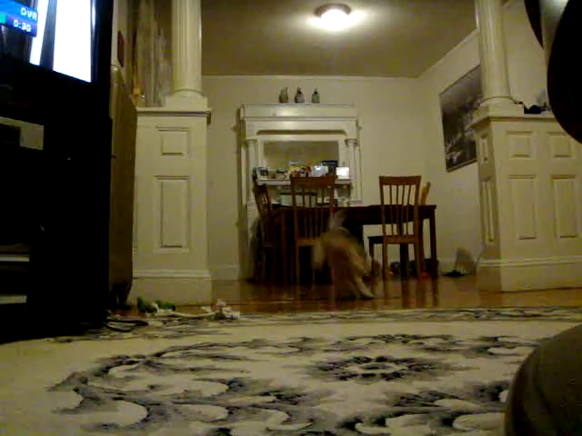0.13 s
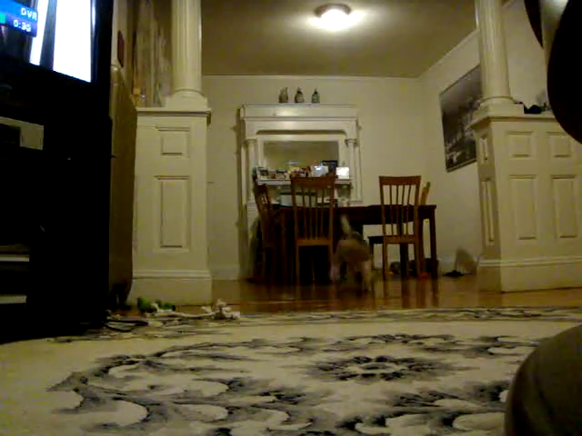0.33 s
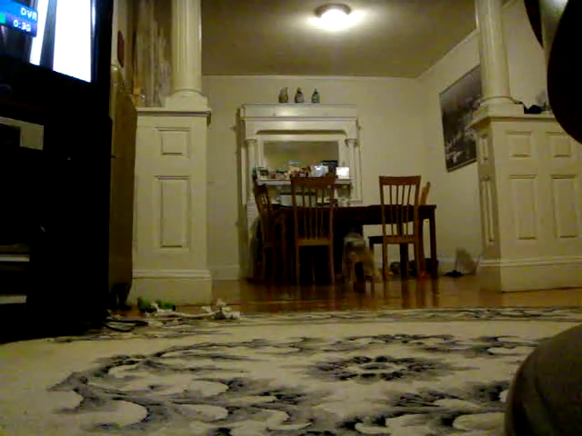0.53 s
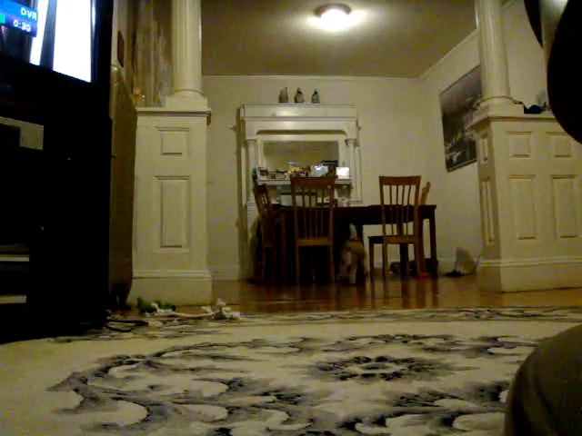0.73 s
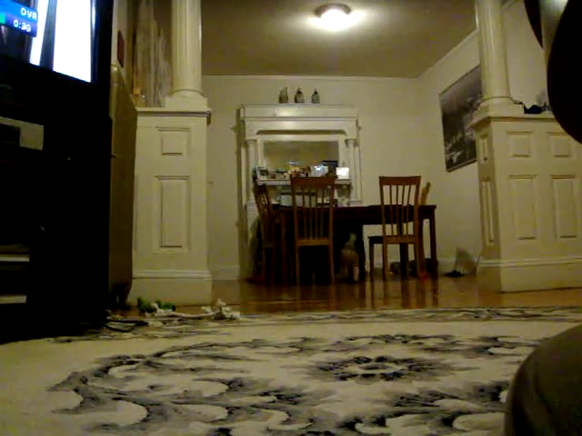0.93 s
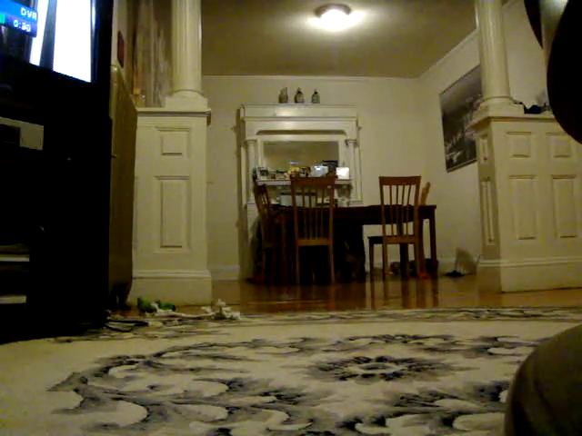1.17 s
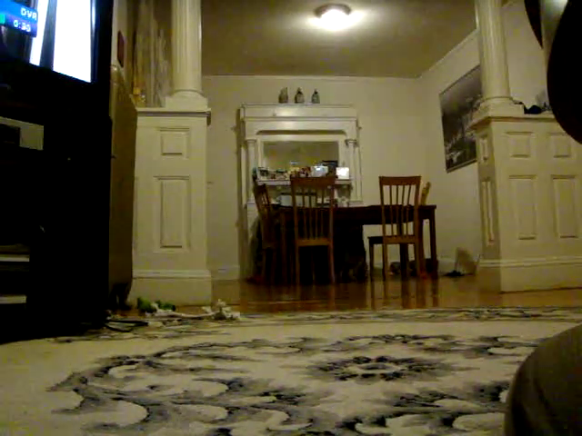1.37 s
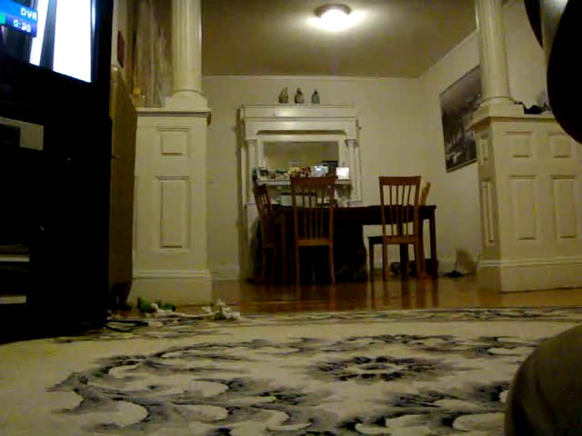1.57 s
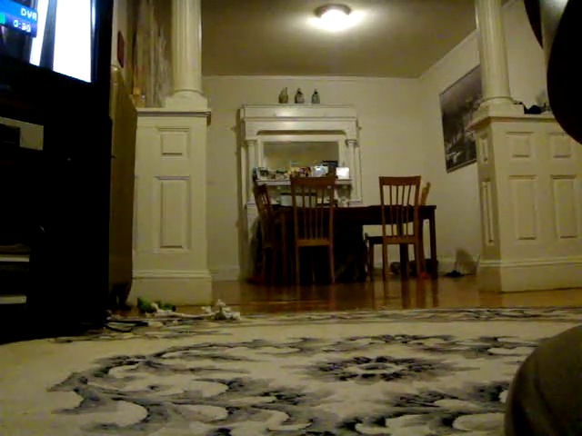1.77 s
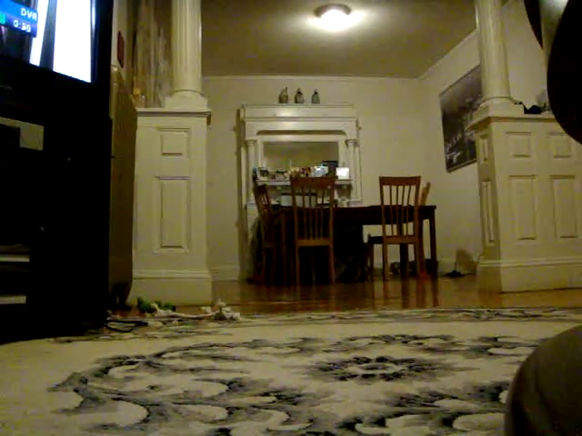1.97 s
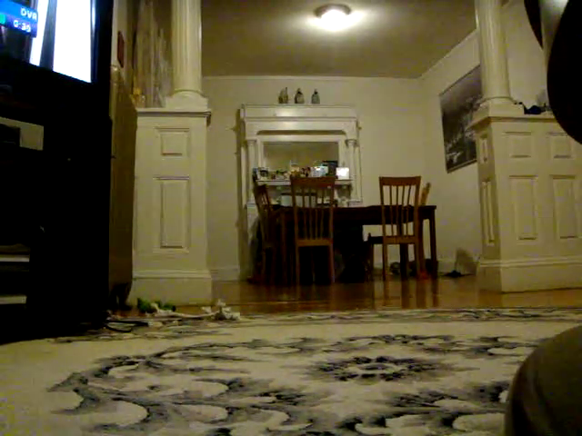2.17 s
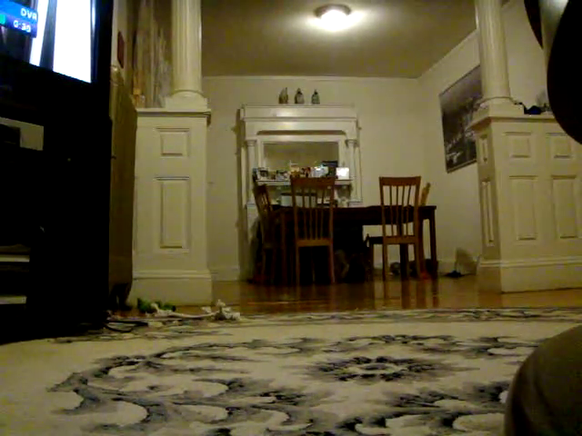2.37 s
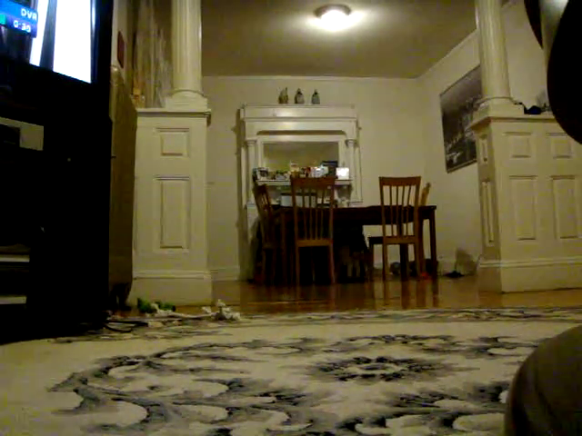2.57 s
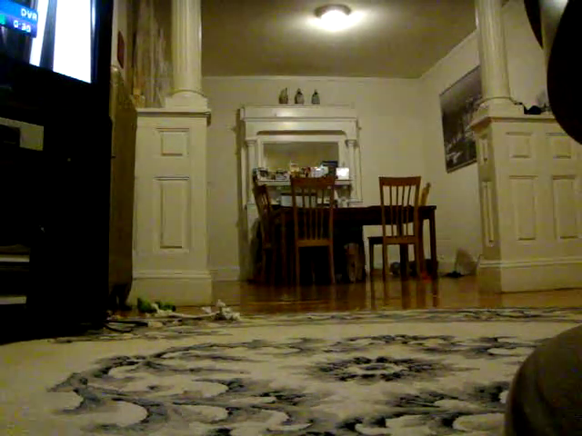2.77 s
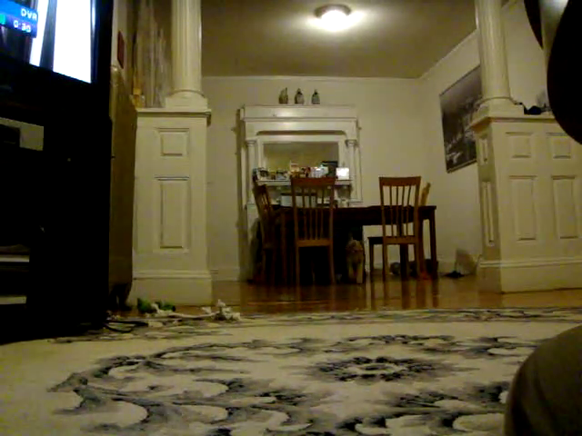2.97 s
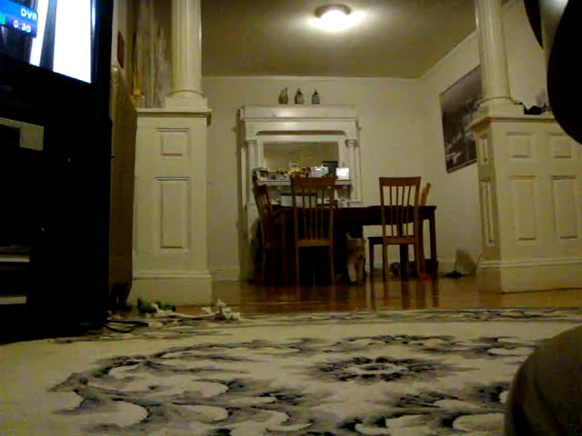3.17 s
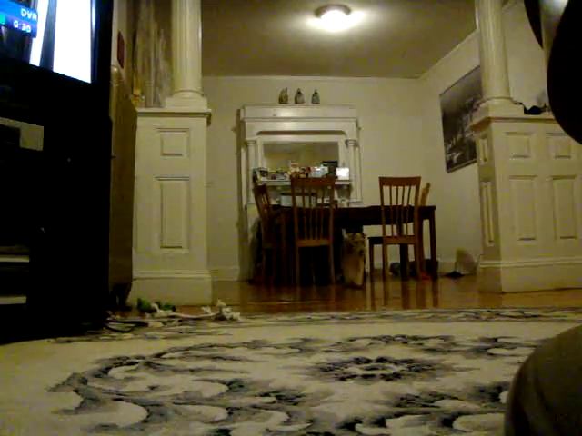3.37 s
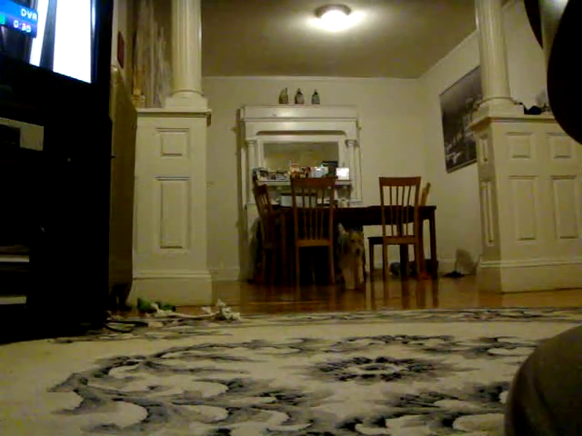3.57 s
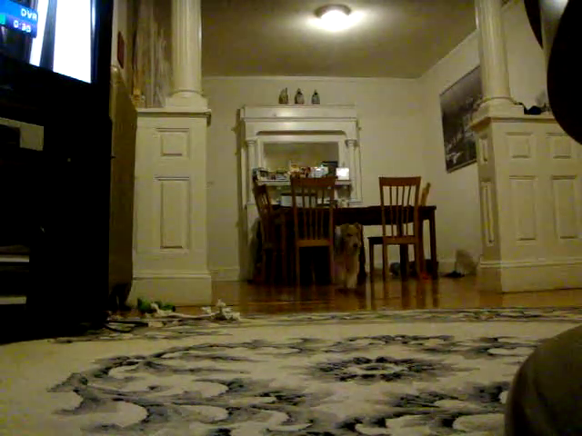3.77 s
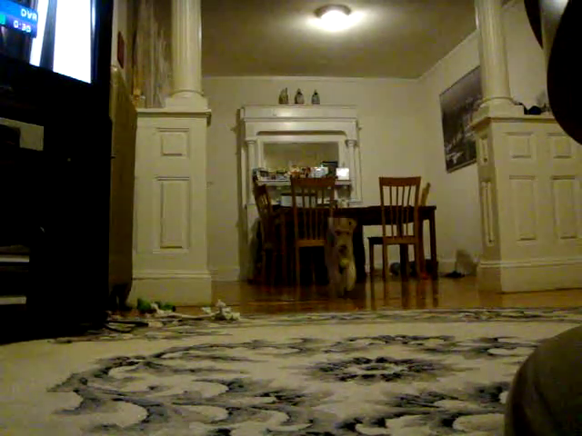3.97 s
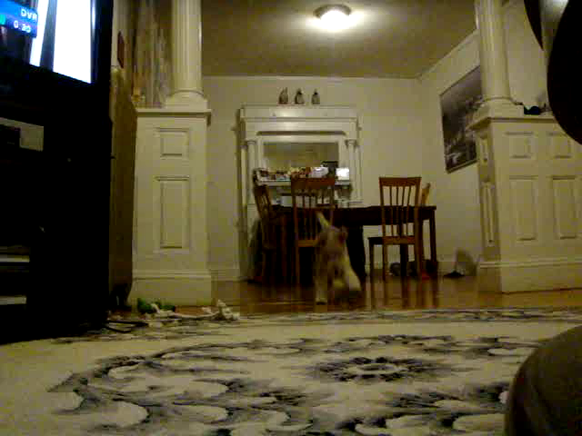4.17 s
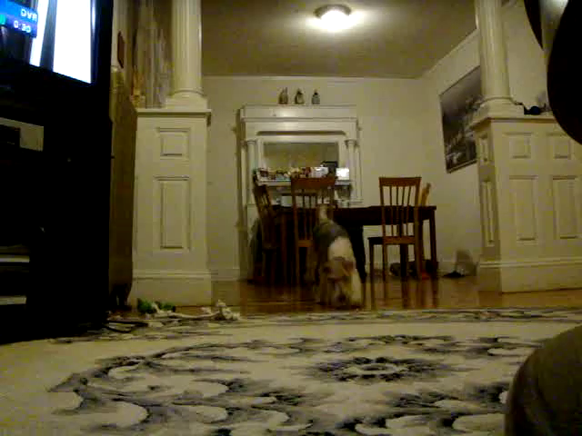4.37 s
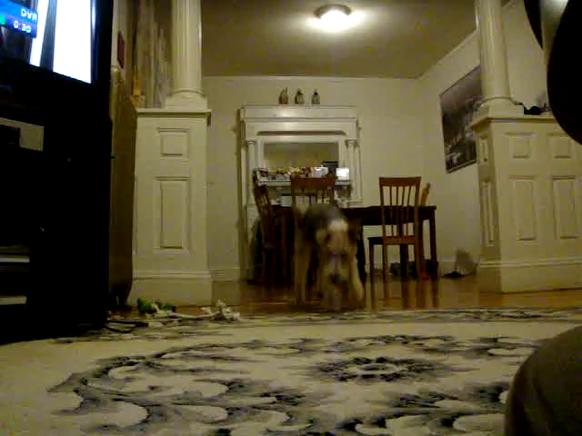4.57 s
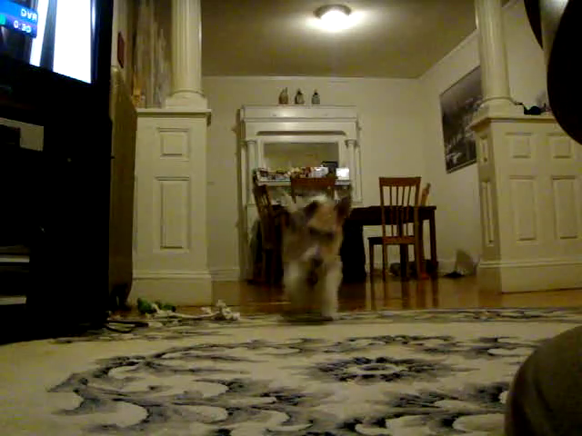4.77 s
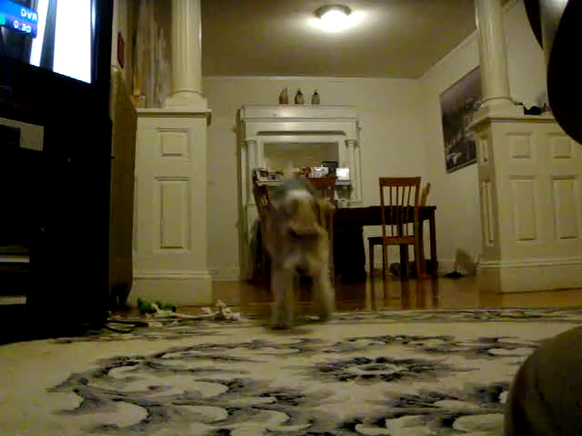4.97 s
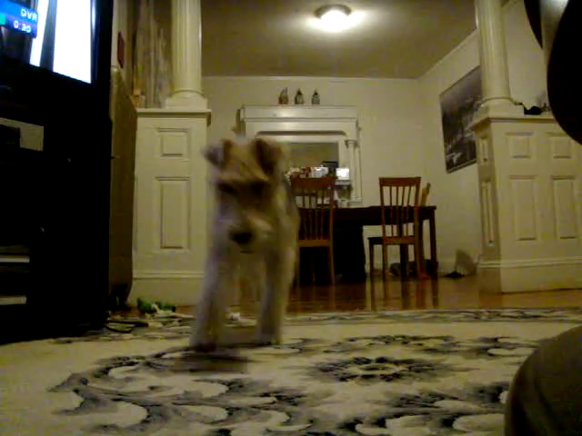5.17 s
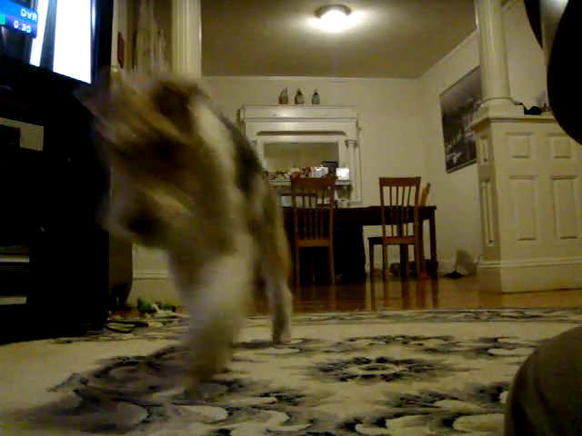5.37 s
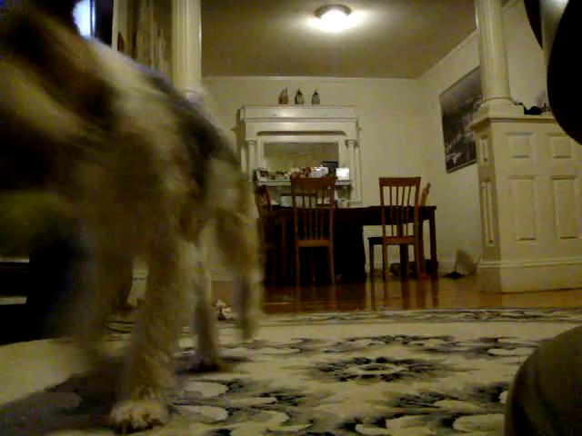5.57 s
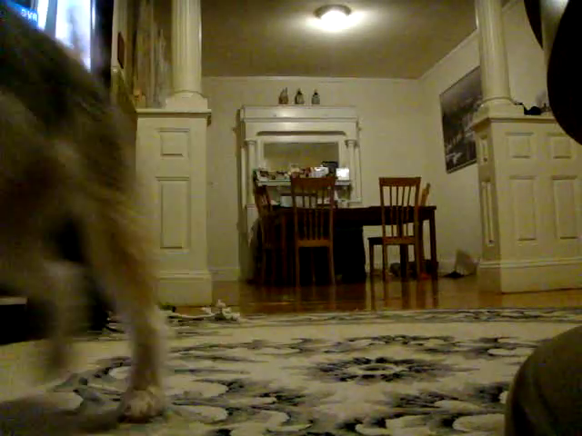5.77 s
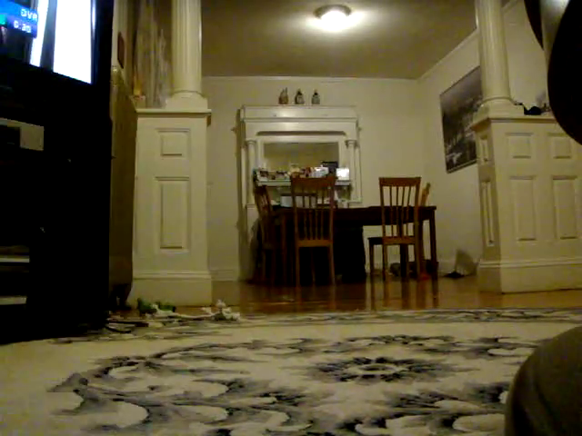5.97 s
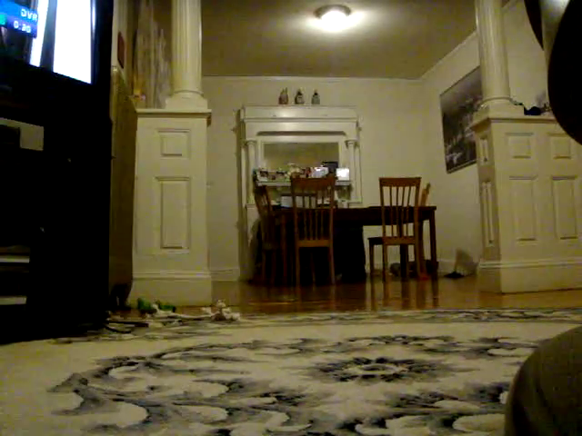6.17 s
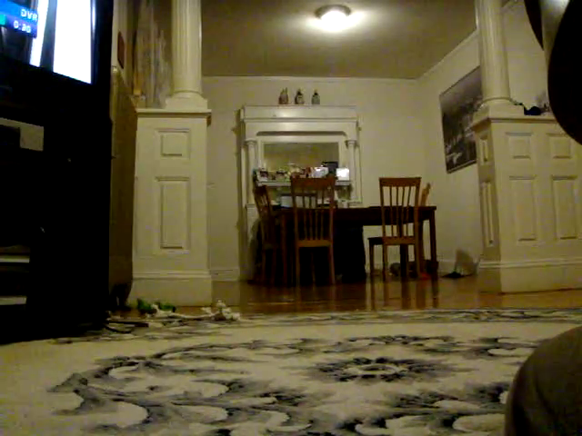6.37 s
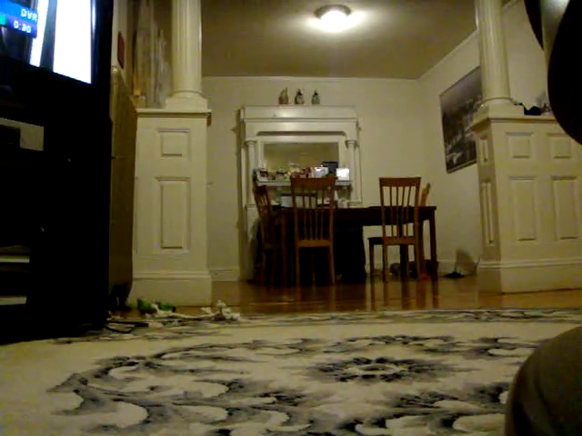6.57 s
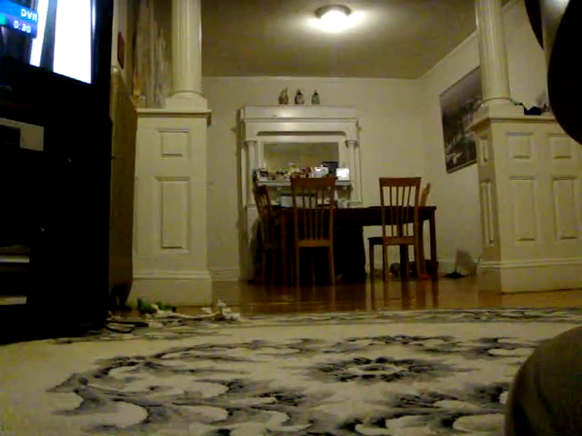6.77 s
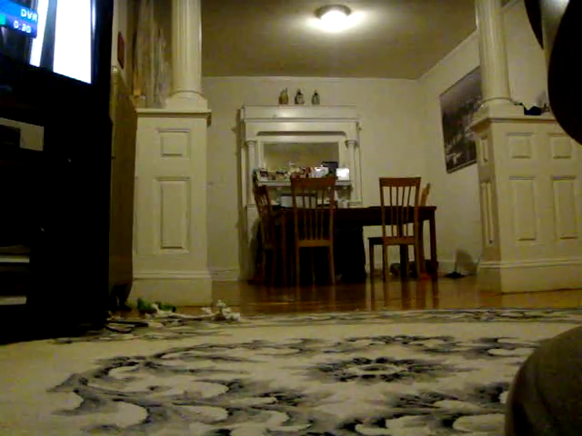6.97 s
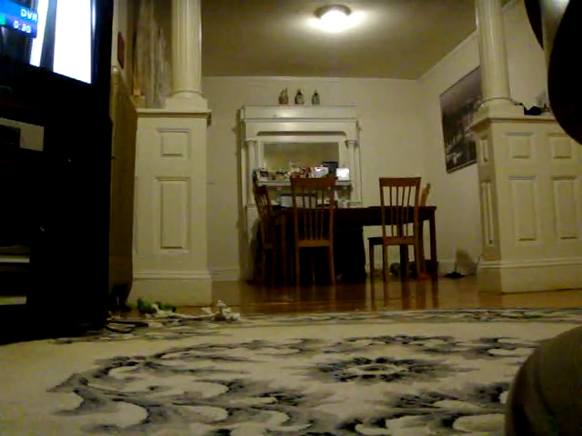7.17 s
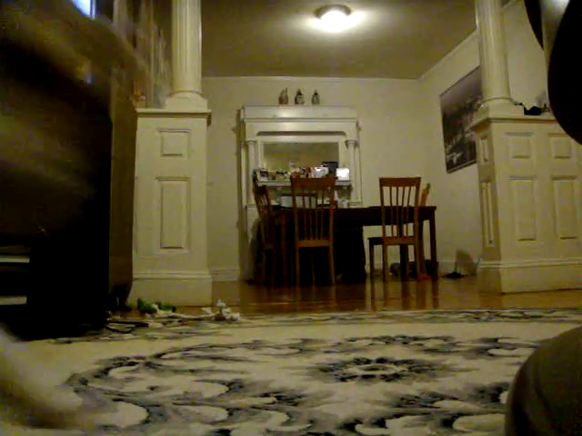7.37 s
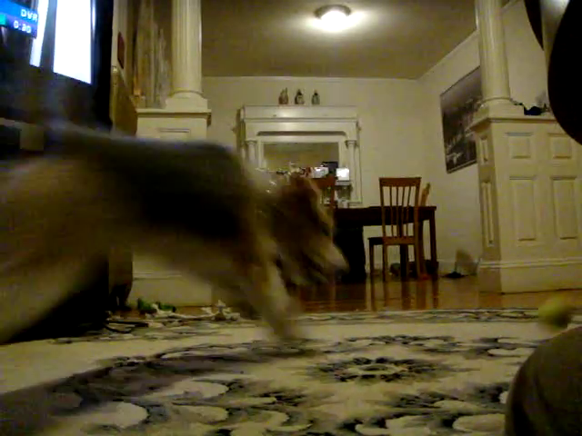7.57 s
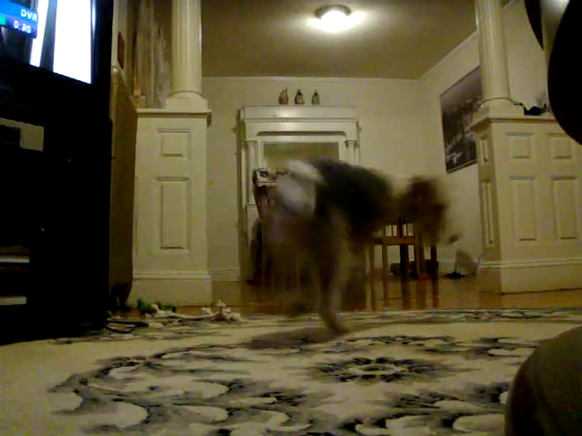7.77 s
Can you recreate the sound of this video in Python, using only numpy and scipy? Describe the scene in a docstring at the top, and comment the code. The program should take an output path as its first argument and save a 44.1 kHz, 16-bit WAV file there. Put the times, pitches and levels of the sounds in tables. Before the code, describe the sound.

Dog paws patter away over hardwood and return, followed by close thumps, ticks and rustling as it plays with a toy on a rug.

```python
"""Small dog on hardwood and rug

A small dog gallops away over a hardwood floor, trots back, pounces on a toy and crosses a rug to play
close by. On the boards its claws click and its pads thud into a live room. Near the microphone, paws
and toy knock, tick and rustle almost dry. Room murmur and camera hiss lie underneath."""
import sys
import numpy as np
from scipy import signal
from scipy.fft import rfft, irfft, next_fast_len
from scipy.io import wavfile
from scipy.ndimage import map_coordinates

SR = 44100
rng = np.random.default_rng(int(sys.argv[2]) if len(sys.argv) > 2 else 0)


def transcribe(u):
    """Save the signal u as a 16-bit wav file named by the first command-line argument.

    u: samples, shape (n,) or (channels, n), limited to [-1, 1]; the rate is SR.
    q: integer samples, one column per channel.
    """
    v = np.clip(np.atleast_2d(u).T, -1, 1)
    q = np.round(v * 32767).astype(np.int16)
    wavfile.write(sys.argv[1], SR, q)


N = 344277


def amp(db):
    """Gain of a level in dB."""
    return 10 ** (np.asarray(db) / 20)


def unit(x):
    """x at rms 1."""
    return x / np.sqrt(np.mean(x ** 2) + 1e-20)


def along(points, hz):
    """Interpolate (Hz, value) points on a log frequency axis."""
    knots_hz, values = np.transpose(points)
    return np.interp(np.log(hz + 1), np.log(knots_hz + 1), values)


def noise(size, gain):
    """Noise of rms 1, coloured by a gain function of frequency."""
    m = next_fast_len(size)
    spectrum = rfft(rng.standard_normal(m)) * gain(np.fft.rfftfreq(m, 1 / SR))
    return unit(irfft(spectrum, m)[:size])


def hump(centre_hz, below, above):
    """Gain function falling by the given dB per octave below and above its centre."""
    def gain(hz):
        octaves = np.log2((hz + 1) / centre_hz)
        return amp(np.where(octaves < 0, below * octaves, -above * octaves))
    return gain


def resonance(hz, centre_hz, width_hz):
    """Bell-shaped gain of one mode, 1 at its centre."""
    return 1 / (1 + ((hz - centre_hz) / (width_hz / 2)) ** 2)


def rise(t, tau_s):
    """Exponential attack from 0 to 1."""
    return 1 - np.exp(-t / tau_s)


def wobble(knots_per_s):
    """Smooth random curve over the whole scene."""
    knots = rng.standard_normal(int(N * knots_per_s / SR) + 4)
    return map_coordinates(knots, [np.arange(N) * knots_per_s / SR])


def add(track, start_s, sound):
    """Mix a sound into the track."""
    part = track[round(start_s * SR):][:len(sound)]
    part += sound[:len(part)]


def room_tail(gain):
    """Fresh noise tail in which each frequency dies at the room's rate."""
    # Room decay. Each row: frequency in Hz, T60 in seconds.
    decay = [(100, 0.76), (700, 0.55), (2000, 0.81), (5000, 0.62), (10000, 0.44)]
    hz, t, spectra = signal.stft(noise(SR * 3 // 4, gain), SR, nperseg=256)
    return signal.istft(spectra * amp(-60 * t / along(decay, hz)[:, None]), SR, nperseg=256)[1]


def background():
    """Room murmur and camera hiss, wavering slightly in level."""
    # Noise spectrum. Each row: frequency in Hz, relative density in dB.
    spectrum = [(12, -57), (20, 7), (91, -19.5), (104, -8), (186, -7), (229, -11.5), (268, -11), (418, -11),
                (452, -11), (603, -15.5), (805, -13), (1160, -16), (2300, -24.5), (9460, -29), (10500, -41),
                (13600, -77), (22000, -120)]
    level_db = -48.5 + 0.33 * wobble(4.98)
    return amp(level_db) * noise(N, lambda f: amp(along(spectrum, f)))


def pads():
    """A soft landing booms in the modes of boards and joists, with a dull knock in the room on top."""
    # Landings. Each row: start in seconds, boom level in dB, boom centre in Hz, knock in dB re boom.
    landings = [(0, -33.5, 125, -9), (0.026, -24.5, 159, -25.5), (0.044, -28, 258, -21),
                (0.073, -36, 111, -21), (0.152, -17.5, 154, -17.5), (0.19, -24.5, 304, -9.5),
                (0.245, -30.5, 188, -22), (0.309, -32, 139, -7.5), (0.409, -29.5, 170, -7.5),
                (0.55, -36, 149, -10), (0.618, -40, 205, -4), (0.743, -34.5, 135, -12.5),
                (0.788, -40.5, 158, -9), (0.872, -55, 142, -7), (0.948, -35.5, 180, -9),
                (1.124, -52.5, 338, 15), (1.143, -37, 184, 0.5), (1.281, -32.5, 300, -6),
                (1.439, -33.5, 157, -7.5), (1.501, -37, 234, -11), (2.413, -36.5, 340, -13.5),
                (2.466, -44, 348, -20), (4.205, -24, 148, -9.5), (4.239, -32.5, 207, -10.5),
                (4.361, -23.5, 156, -16.5), (4.42, -25.5, 192, -11), (4.529, -33.5, 230, -0.5),
                (4.598, -36.5, 254, -14)]
    # Hollow modes of boards and room. Each row: centre in Hz, width in Hz, gain in dB.
    modes = [(105.5, 116, 9), (150.4, 55, -5.5), (191, 71, -3.5), (245.4, 23, 2.5), (345.6, 35, 3),
             (417, 22, -4.5), (536, 49, -7)]
    # The dog's run out and back. Each row: time in seconds, distance in metres.
    path = [(0, 1.7), (0.3, 5.5), (1.2, 6.9), (2.4, 5.3), (3.5, 5.5), (4.2, 3.9), (4.6, 1)]
    out, t = np.zeros(N), np.arange(SR // 2) / SR
    boards = lambda f: 0.16 + sum(amp(db) * resonance(f, hz, width) for hz, width, db in modes)
    for start_s, db, hz, knock_db in landings:
        distance_m = np.interp(start_s, *np.transpose(path))
        t60_s = 0.13 + 0.061 * distance_m  # a far boom lasts longer: more of it is room
        fade = amp(-60 * t / t60_s)
        rumble = noise(len(t), lambda f: hump(hz, below=15, above=5)(f) * boards(f))
        boom = unit(rumble * fade) * np.sqrt(np.mean(fade ** 2))
        knock = amp(knock_db) * room_tail(hump(1054, below=2.35, above=7.5))[:len(t)]
        add(out, start_s, amp(db) * (boom * rise(t, 0.0032) + knock * rise(t, 0.0017)))
    return out


def claws():
    """A claw's short, gritty scratch rings the varnished board; the room builds up behind it."""
    # Claw strikes. Each row: start in seconds, level in dB, ring in Hz, room in dB re scratch,
    # fall below the ring in dB per octave.
    strikes = [(0.132, -36, 7900, -7.5, 5), (0.165, -27.5, 9200, -7, 1), (0.184, -27.5, 3040, -3.5, 3),
               (0.2182, -26.5, 4770, -10.5, 3), (0.313, -30, 3770, -8.5, 9), (0.408, -30.5, 4000, -3, 1),
               (0.4924, -29.5, 2770, -10, 17), (0.5608, -35, 4100, -2, -2), (0.6237, -29, 3320, -16, 1),
               (0.648, -31.5, 2600, -8, -1), (0.761, -31, 2700, -14, 2), (0.876, -29.5, 3100, -8, -6),
               (0.881, -23.5, 8300, -41, 5), (0.9445, -30, 4220, -5, -6), (0.954, -25, 6980, -10, -1),
               (1.135, -23, 3700, -7.5, -3), (1.17, -27, 3050, -6.5, -5), (1.2895, -31.5, 3860, -4.5, -1),
               (1.7437, -32.5, 3430, -5.5, -6), (2.395, -43.5, 3460, -10, 9), (2.8661, -37, 2700, -6, 4),
               (3.0597, -34, 4380, -6, -2), (3.25, -33.5, 3430, -7, -6), (3.2566, -34, 5370, -16, 12),
               (3.4494, -31.5, 4140, -6.5, -4.5), (3.6352, -31.5, 8700, -12, 1),
               (3.6405, -34.5, 7100, -6.5, -6.5), (3.7702, -33, 7700, -18, 3),
               (3.7785, -33.5, 2710, -10, 0), (3.844, -35.5, 6700, -9, -5.5), (3.9694, -33, 6700, -5, -3.5),
               (4.0782, -36, 7240, -9, 5), (4.1252, -37, 4550, -7, -7), (4.2103, -40, 4510, -6, 12),
               (4.4154, -18, 7900, -8, 2.5), (4.431, -20.5, 5940, -8, 7), (4.443, -19.5, 6900, -20, 4),
               (4.453, -20, 6500, -19, 14), (4.5384, -21.5, 6370, -8, -0.5), (4.5814, -35, 5220, -9, 11)]
    # Modes of the varnished surface. Each row: centre in Hz, width in Hz, gain in dB.
    modes = [(2300, 500, -13), (3200, 740, -6), (3590, 290, -11), (4680, 1100, -7), (5620, 1300, -5),
             (6740, 260, -5), (7860, 2200, -5.5)]
    cut_hz, skid_s = 1700, 0.0052
    out = np.zeros(N)
    spots_db = rng.normal(0, 4, (len(strikes), len(modes)))  # each spot stirs the modes differently
    for (start_s, db, hz, room_db, fall), spot_db in zip(strikes, spots_db):
        def colour(f):
            varnish = sum(amp(mode_db + offset_db) * resonance(f, mode_hz, width_hz)
                          for (mode_hz, width_hz, mode_db), offset_db in zip(modes, spot_db))
            ring = amp(5.5) * resonance(f, hz, width_hz=380)
            low_cut = 1 / (1 + (cut_hz / (f + 1)) ** 3)  # a claw is too light to drive the lows
            return hump(hz, below=fall, above=1)(f) * low_cut * (1 + varnish + ring)
        tail = room_tail(colour)
        t = np.arange(len(tail)) / SR
        grit = amp(3 * noise(len(t), lambda f: f < 900))
        skid = np.exp(-t / skid_s) * rise(t, skid_s / 8)
        scratch = unit(noise(len(t), colour) * grit * skid) * np.sqrt(np.mean(skid ** 2))
        add(out, start_s, amp(db) * (scratch + amp(room_db) * tail * rise(t, 0.007)))
    return out


def rug():
    """Paws and body shift on the rug: a low shuffle and a high swish, both lumpy."""
    # Movement. Each row: time in seconds, shuffle level in dB, swish level in dB.
    movement = [(4.75, -52, -84), (4.94, -56.5, -60), (5.56, -57.5, -68), (5.92, -46.5, -62),
                (6.12, -55, -55.5), (6.25, -45.5, -58), (6.54, -42, -55), (6.83, -46, -58),
                (7.24, -40.5, -56.5), (7.4, -44, -55.5), (7.53, -41, -52), (7.67, -40, -56),
                (7.81, -39.5, -54.5)]
    # Spectra of the two layers. Each row: frequency in Hz, relative density in dB.
    shuffle_spectrum = [(29, -57), (50, -11.5), (127, -0.5), (313, -7.5), (369, -1.5), (412, -18),
                        (486, -3.5), (4000, -27), (5200, -63), (8800, -120)]
    swish_spectrum = [(710, -32), (1200, -3.5), (2090, -18), (2890, -7.5), (7510, -11), (9680, -12),
                      (10500, -42), (13600, -62), (22000, -120)]
    times_s, shuffle_db, swish_db = np.transpose(movement)
    envelope = lambda db: amp(np.interp(np.arange(N) / SR, times_s, db, left=-120))
    shuffle = unit(noise(N, lambda f: amp(along(shuffle_spectrum, f))) * amp(3 * wobble(70)))
    swish = unit(noise(N, lambda f: amp(along(swish_spectrum, f))) * amp(3 * wobble(120)))
    return envelope(shuffle_db) * shuffle + envelope(swish_db) * swish


def thumps():
    """A near blow: dying cycles that sag in pitch (high bending waves arrive first), then a rattle."""
    # Blows of paw and toy. Each row: start in seconds, peak in dB, final pitch in Hz, T60 in seconds.
    blows = [(4.838, -45, 217, 0.17), (5.116, -50, 349, 0.2), (5.181, -48, 310, 0.03),
             (5.379, -42, 312, 0.022), (5.545, -41, 299, 0.086), (5.7386, -3.5, 402, 0.0072),
             (5.7399, -8, 108.4, 0.045), (5.747, -18, 227, .05), (5.811, -25.5, 586, 0.013),
             (5.978, -48, 100, 0.18), (6.0504, -4.5, 530, 0.0047), (6.05, -13.5, 192, 0.033),
             (6.264, -44, 385, 0.055), (6.337, -24.5, 210, 0.054), (6.453, -30, 205, 0.1),
             (6.577, -35.5, 470, 0.024), (6.631, -38, 410, 0.057), (6.838, -31.5, 318, 0.028),
             (6.89, -35.5, 400, 0.035), (6.981, -34, 375, 0.027), (7.072, -29, 201, 0.03),
             (7.093, -33, 270, 0.074), (7.104, -25, 450, 0.016), (7.153, -33, 302, 0.034),
             (7.28, -40, 294, 0.022), (7.313, -25, 338, 0.095), (7.3473, -18.5, 430, 0.014),
             (7.35, -22, 129, 0.055), (7.458, -18.5, 312, 0.017), (7.5736, -17, 377, 0.011),
             (7.579, -24, 96, 0.1), (7.6101, -14.5, 433, 0.01), (7.615, -21.5, 126, 0.049),
             (7.726, -31.5, 397, 0.021), (7.77, -43, 120, 0.24)]
    min_t60_s = 0.006
    out, t = np.zeros(N), np.arange(SR // 3) / SR
    for start_s, db, hz, t60_s in blows:
        cycles = hz * t + 0.55 * rise(t, 0.35 / hz)
        attack = 1 - np.exp(-(hz * t / 1.1) ** 2)
        fade = amp(-60 * (t / max(t60_s, min_t60_s)) ** 1.4)
        swing = np.sin(2 * np.pi * cycles) * attack * fade
        rattle = noise(len(t), hump(1.34 * hz, below=1.9, above=13.3))
        rattle_db = -21.5 + 0.59 * db - 4 * np.log2(hz / 300)  # harder, deeper blows shake more
        rattle *= amp(rattle_db - 60 * t / 0.28) * rise(t, 0.003)
        add(out, start_s, amp(db) * swing / np.abs(swing).max() + rattle)
    return out


def fur_strokes():
    """Fur drags over the rug in grainy swells that rise quickly, hold, then fade."""
    # Strokes. Each row: start in seconds, length in seconds, level in dB, spectral peak in Hz.
    strokes = [(5.159, 0.085, -50, 1470), (5.445, 0.24, -53, 2400), (5.831, 0.11, -53.5, 2000),
               (6.064, 0.12, -49, 5000), (6.072, 0.13, -40.5, 795), (6.238, 0.07, -44.5, 3480),
               (6.832, 0.092, -53.5, 4020), (7.061, 0.17, -52, 1990), (7.338, 0.14, -49.5, 1900),
               (7.457, 0.034, -57, 6100), (7.565, 0.13, -52.5, 4100)]
    out = np.zeros(N)
    for start_s, length_s, db, hz in strokes:
        progress = np.linspace(0, 1, int(length_s * SR))
        swell = np.minimum(progress / 0.13, (1 - progress) / 0.28).clip(0, 1)
        grain = amp(2.5 * noise(len(swell), lambda f: f < 250))
        friction = noise(len(swell), hump(hz, below=0.96, above=7.3))
        add(out, start_s, amp(db) * unit(friction * grain) * swell)
    return out


def ticks():
    """A hard edge rings briefly over a tiny snap and leaves a hollow afterglow."""
    # Near ticks. Each row: start in seconds, ring level in dB, pitch in Hz.
    contacts = [(5.181, -27, 1150), (5.223, -29.5, 1210), (5.7471, -7, 1080), (5.7539, -17.5, 1840),
                (5.795, -22.5, 1840), (5.81, -25, 1230), (5.8913, -31, 1860), (5.973, -34, 1950),
                (6.0564, -14.5, 1810), (6.0649, -13.5, 1790), (6.343, -23.5, 1770), (6.352, -20, 1810),
                (6.3797, -31, 1810), (6.479, -24, 1800), (6.4912, -23, 1820), (6.5476, -24.5, 1760),
                (6.6396, -31, 1800), (7.028, -21.5, 2160), (7.072, -27, 1240), (7.093, -37, 1240),
                (7.113, -27.5, 1780), (7.126, -25.5, 1330), (7.2086, -29, 1840), (7.3467, -20.5, 2030),
                (7.3637, -22.5, 1750), (7.382, -28, 2060), (7.3957, -21, 1770), (7.4078, -17, 1780),
                (7.419, -18, 2020), (7.424, -20, 1960), (7.438, -16, 2440), (7.4564, -26, 1550),
                (7.471, -19, 1800), (7.49, -28, 1230), (7.697, -34, 1480)]
    ring_t60_s, snap_t60_s, glow_t60_s = 0.009, 0.014, 0.19
    out, t = np.zeros(N), np.arange(SR // 6) / SR
    for start_s, db, hz in contacts:
        ring = np.sin(2 * np.pi * hz * t) * amp(db - 60 * t / ring_t60_s)
        snap = noise(len(t), hump(2210, below=1.1, above=12.9)) * amp(-10 - 60 * t / snap_t60_s)
        glow = noise(len(t), hump(2010, below=7.6, above=27)) * amp(-27.5 - 60 * t / glow_t60_s)
        add(out, start_s, (ring + amp(0.86 * db) * (snap + glow)) * rise(t, 0.00044))
    return out


def crackles():
    """Thin bursts of treble as the dog springs off the rug."""
    # Crackles. Each row: start in seconds, level in dB.
    bursts = [(7.4585, -27.5), (7.4684, -31), (7.4904, -48), (7.5017, -28), (7.517, -26.5), (7.622, -36),
              (7.6435, -45), (7.6575, -36), (7.6654, -37), (7.704, -28.5)]
    t60_s = 0.011
    out, t = np.zeros(N), np.arange(SR // 40) / SR
    for start_s, db in bursts:
        treble = noise(len(t), hump(7700, below=8.8, above=3))
        add(out, start_s, treble * amp(db - 60 * t / t60_s) * rise(t, 0.00024))
    return out


def scene():
    """All sources at one microphone."""
    return (claws() + pads() + thumps() + ticks() + crackles() + fur_strokes() + rug()
            + background())[None]


def record(dry):
    """The small microphone loses the deep bass; the camera cuts off above its band limit."""
    bass_cut_hz, top_hz = 63, 10100
    thin = signal.sosfilt(signal.butter(3, bass_cut_hz, "high", fs=SR, output="sos"), dry)
    m = next_fast_len(N + SR // 4)
    over_hz = np.clip(np.fft.rfftfreq(m, 1 / SR) - top_hz, 0, None)
    loss_db = np.minimum(over_hz / 6, 36 + over_hz / 45) + 40 * (over_hz > 1200)
    return irfft(rfft(thin, m) * amp(-loss_db), m)[:, :N]


dry = scene()
out = record(dry)
transcribe(out)
```